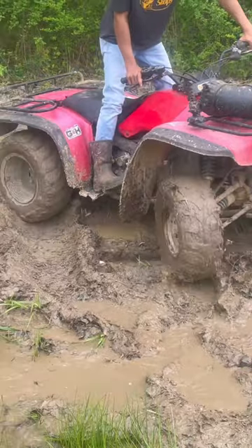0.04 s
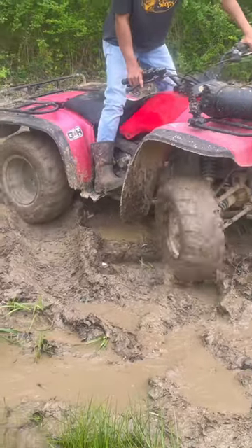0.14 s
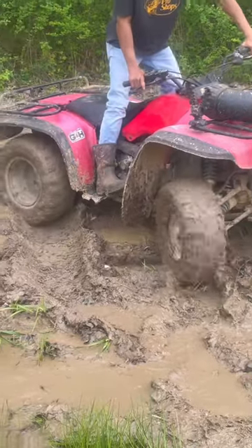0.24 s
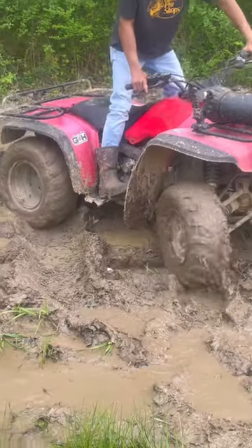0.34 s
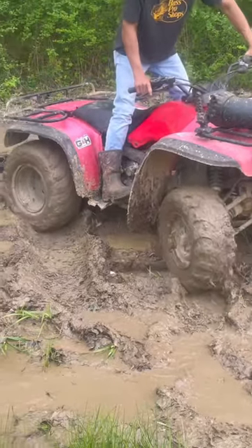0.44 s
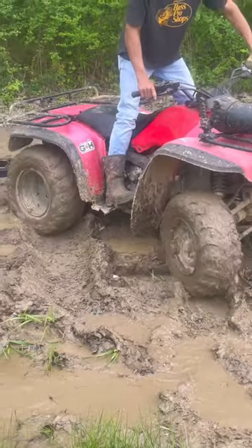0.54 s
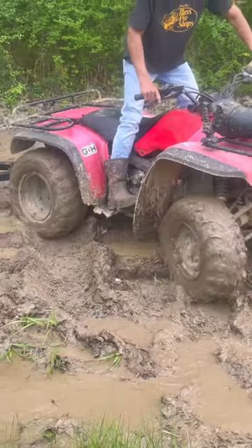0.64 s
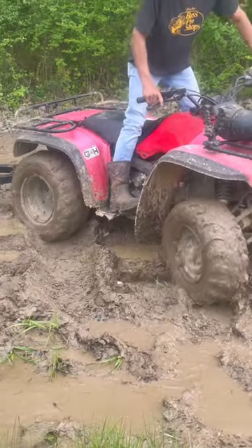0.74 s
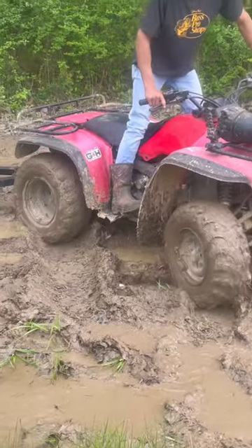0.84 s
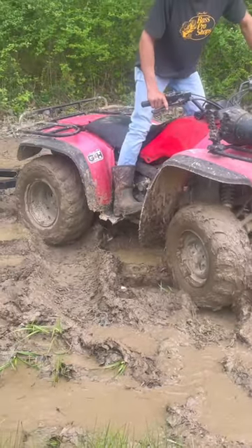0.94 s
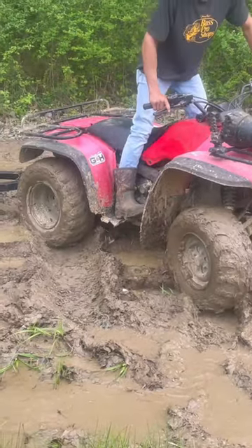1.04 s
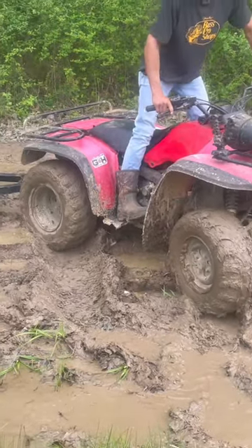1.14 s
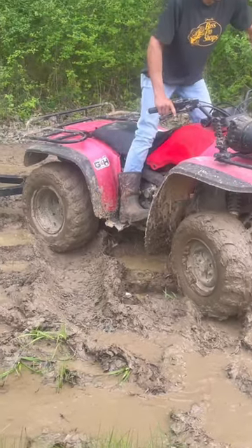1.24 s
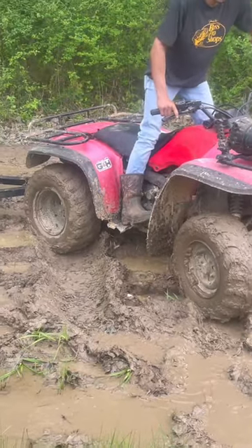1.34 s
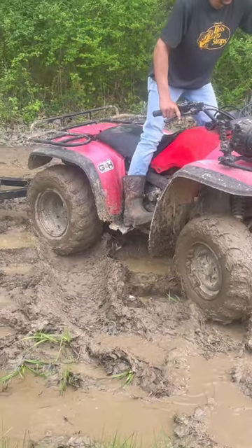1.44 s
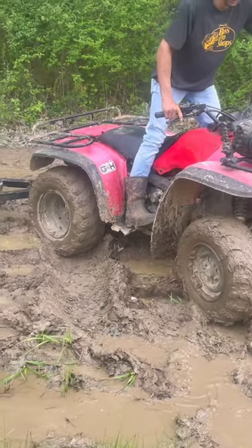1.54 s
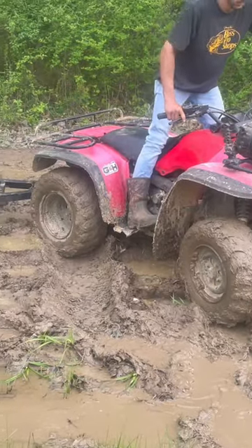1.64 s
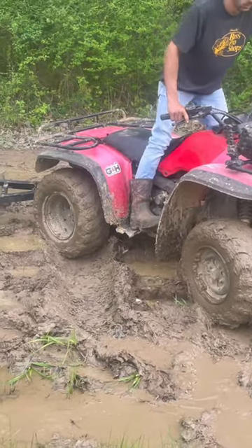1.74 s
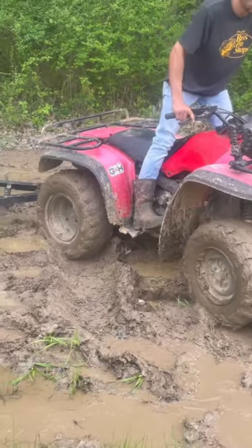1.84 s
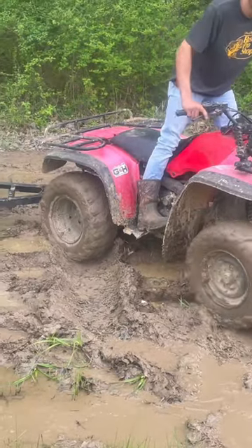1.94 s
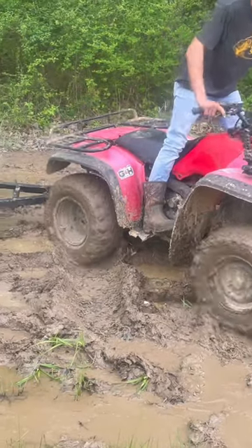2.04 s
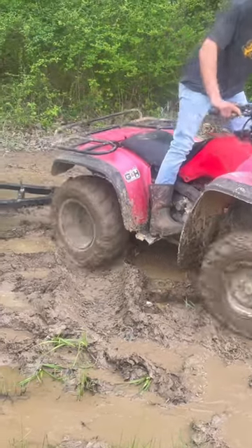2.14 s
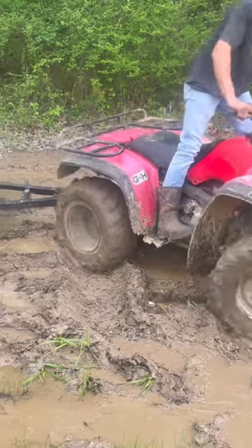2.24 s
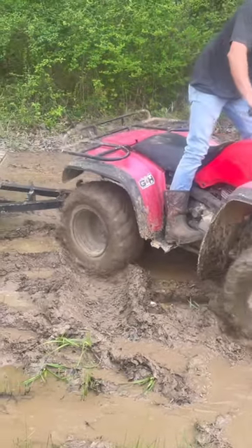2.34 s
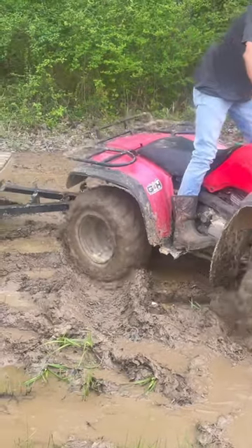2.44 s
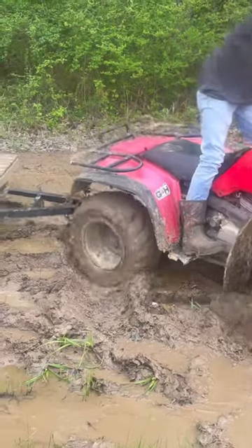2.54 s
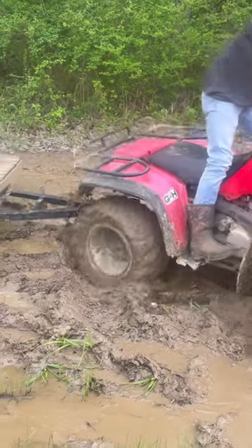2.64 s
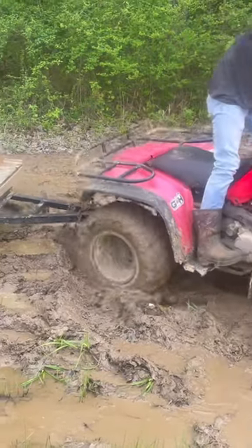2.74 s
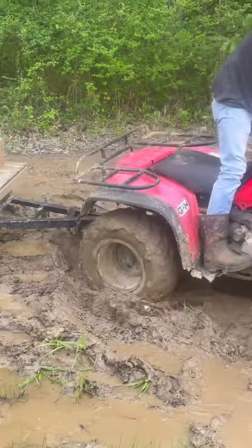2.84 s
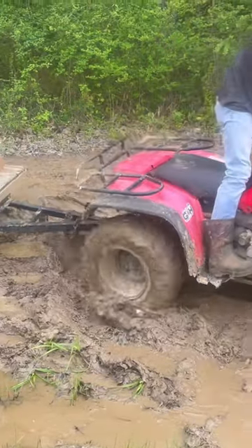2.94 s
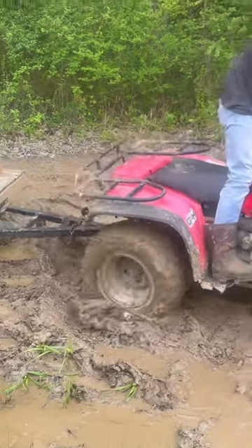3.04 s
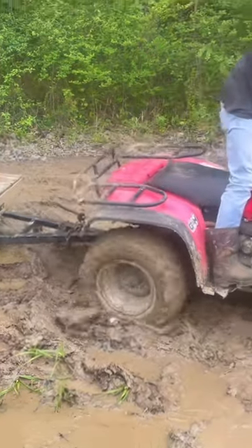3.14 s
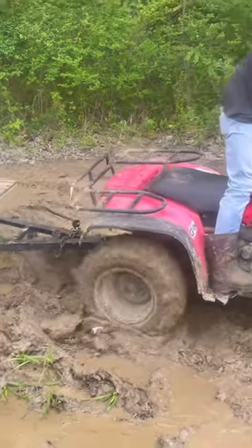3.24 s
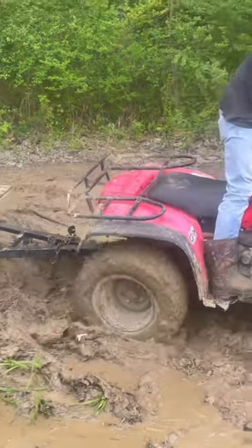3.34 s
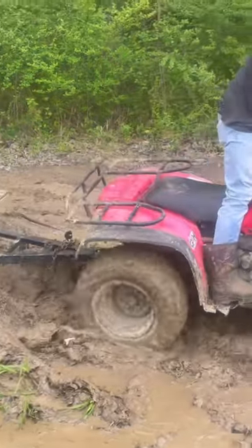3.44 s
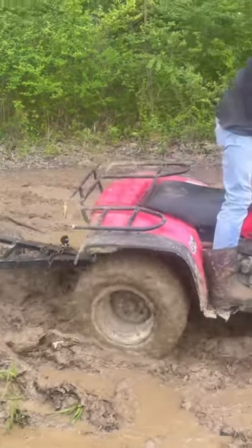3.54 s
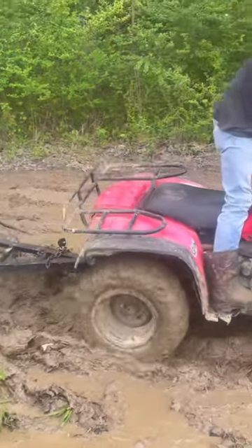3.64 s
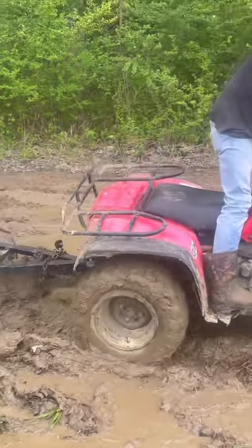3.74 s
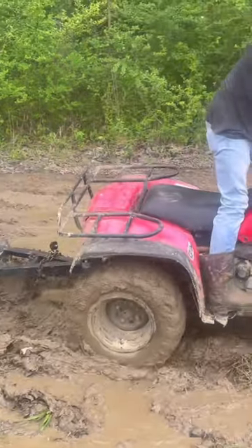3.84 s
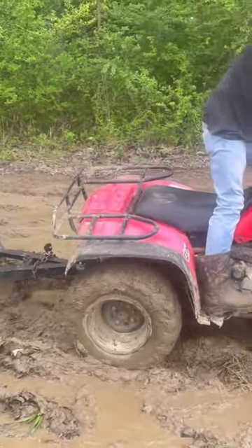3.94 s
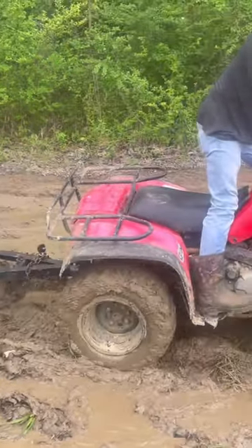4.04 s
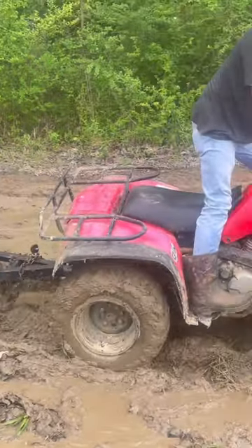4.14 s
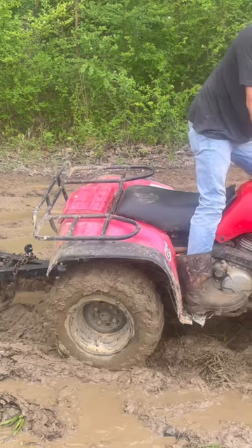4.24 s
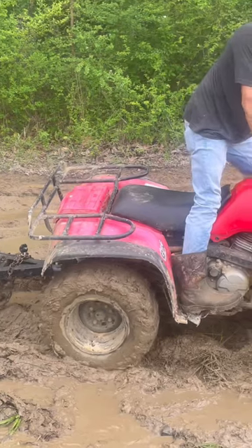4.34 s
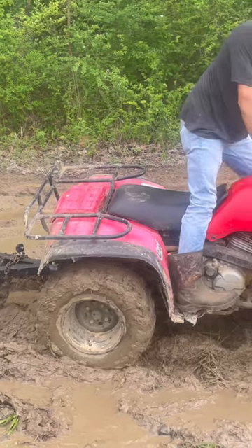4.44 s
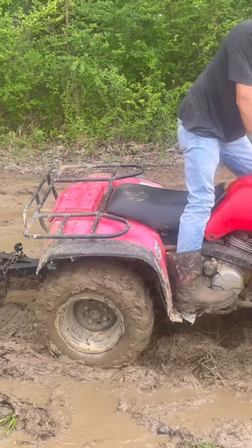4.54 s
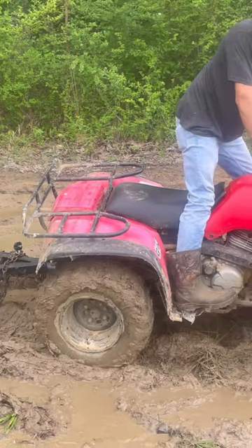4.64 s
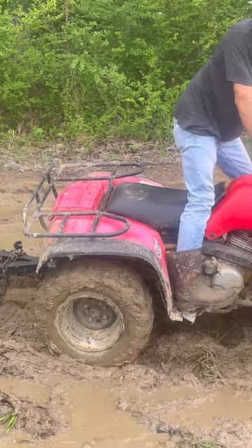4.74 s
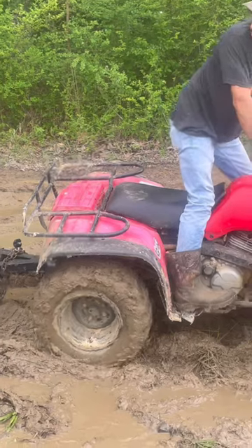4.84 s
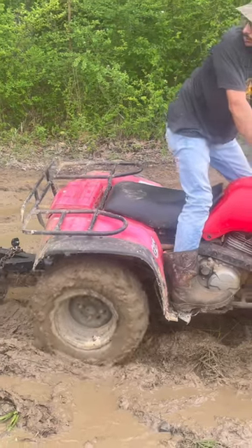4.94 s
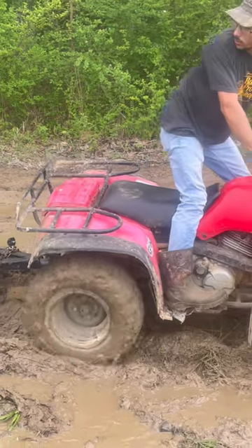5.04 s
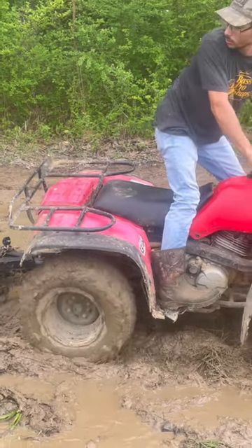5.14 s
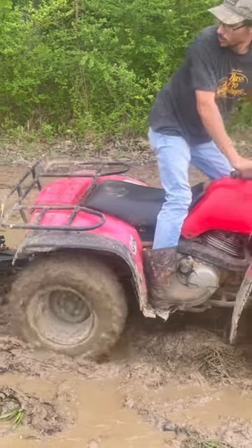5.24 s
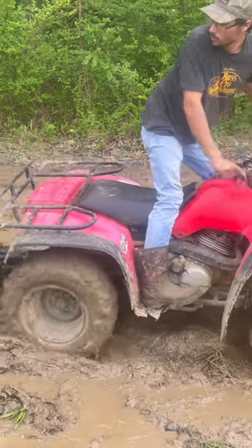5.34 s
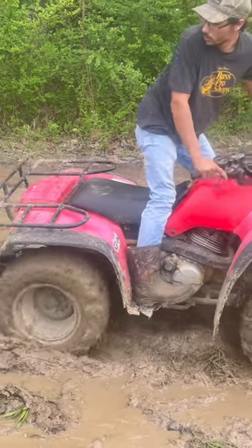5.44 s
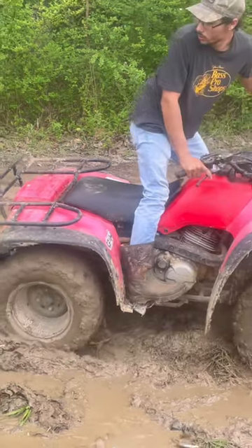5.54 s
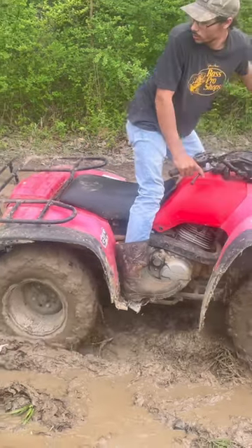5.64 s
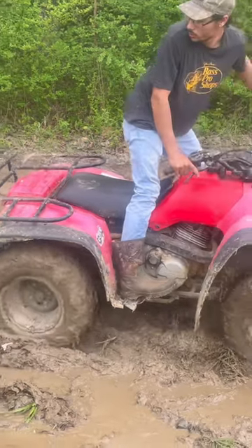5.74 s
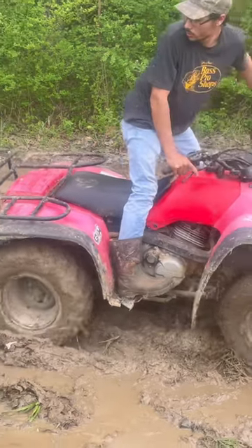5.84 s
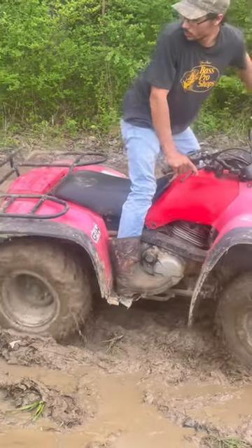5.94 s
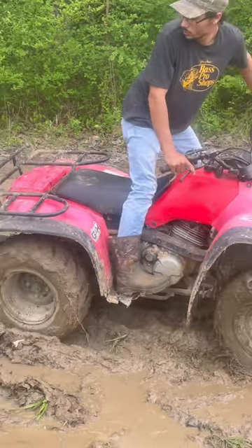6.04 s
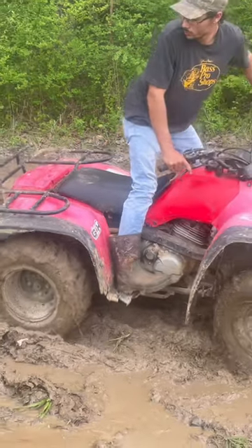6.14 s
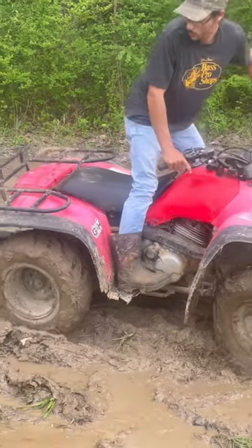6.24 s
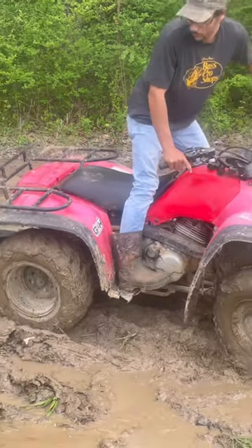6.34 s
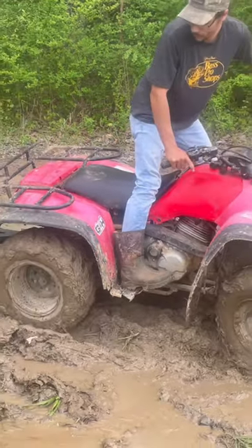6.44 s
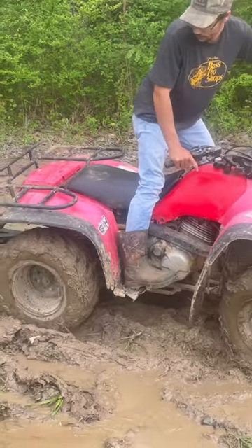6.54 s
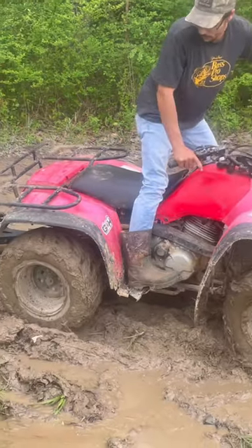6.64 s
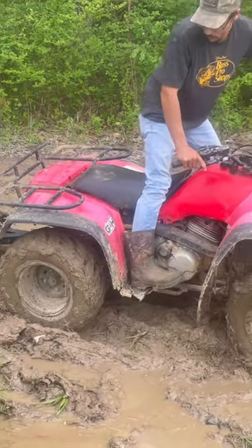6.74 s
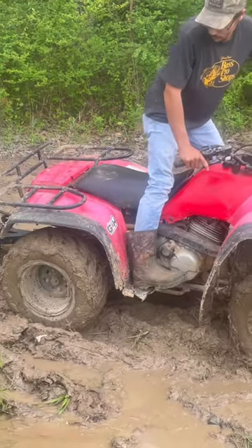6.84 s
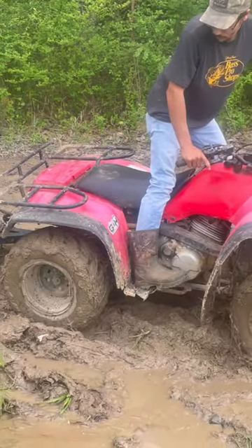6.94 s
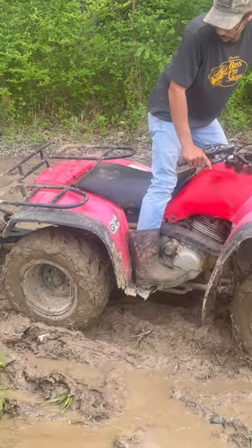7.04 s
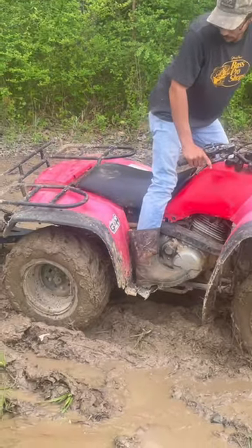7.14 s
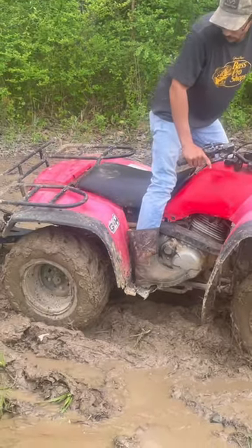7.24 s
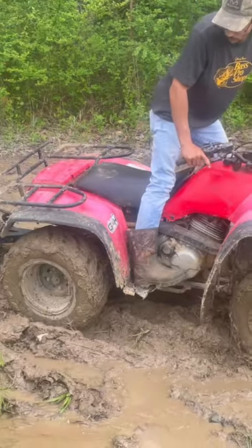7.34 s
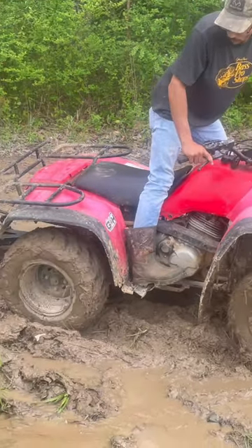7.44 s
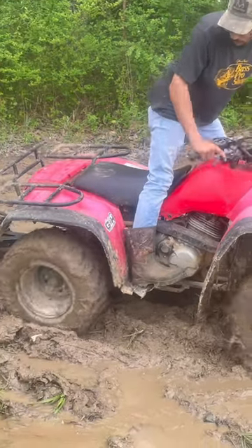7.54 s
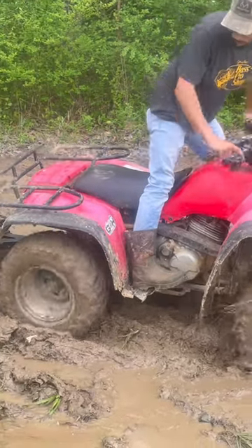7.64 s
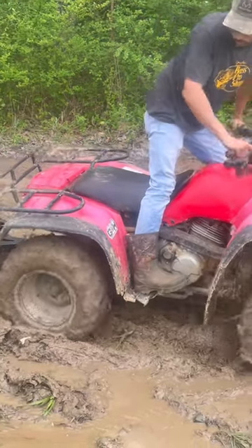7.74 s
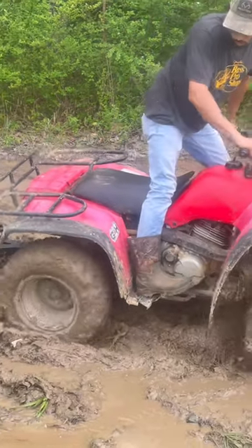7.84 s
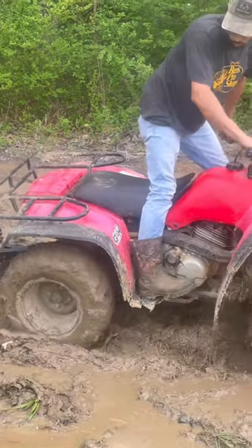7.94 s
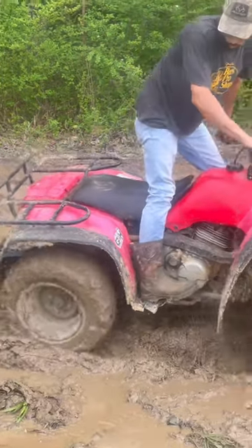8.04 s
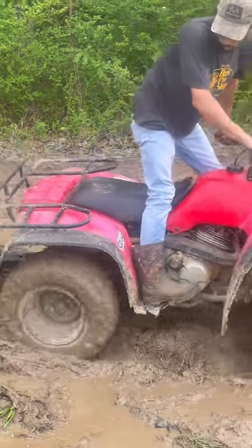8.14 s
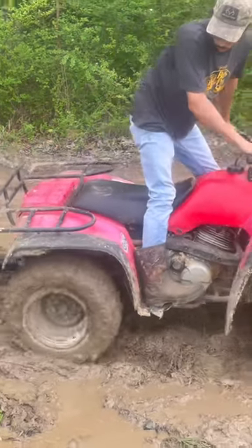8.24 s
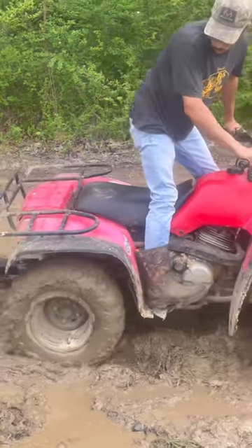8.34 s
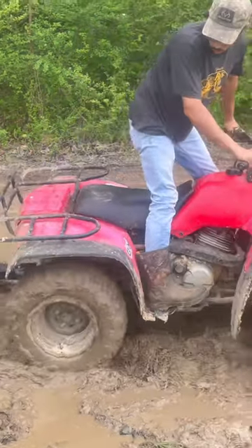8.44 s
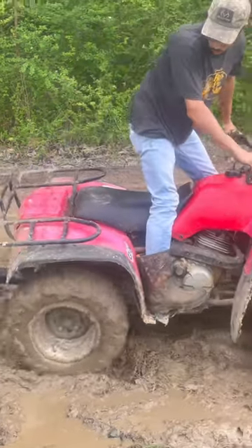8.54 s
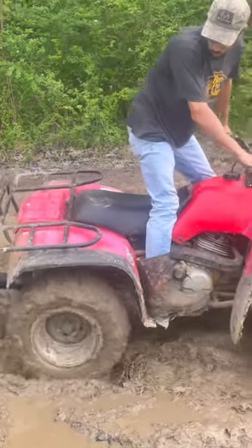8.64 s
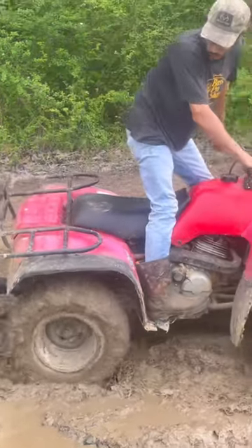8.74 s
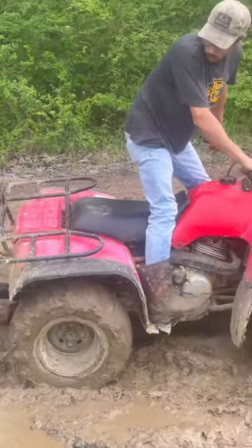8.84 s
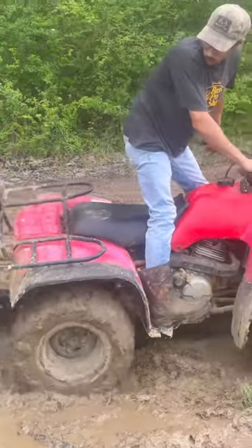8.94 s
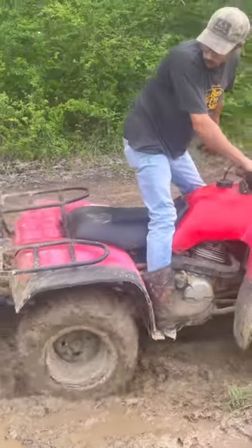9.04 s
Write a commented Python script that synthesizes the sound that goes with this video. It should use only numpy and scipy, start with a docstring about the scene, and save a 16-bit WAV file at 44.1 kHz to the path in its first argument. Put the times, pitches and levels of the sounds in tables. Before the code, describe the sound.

Outdoor close-up of a small four-stroke engine hauling a load: separate deep thumps at idle merge into a rough, rasping growl at each throttle opening. Short coughs mark the pick-ups, a hollow intake honk colours the early pulls, and tyres hiss and squelch through wet mud. Three long surges are split by lumpy, faltering idles, and the last is held to the end. Mechanical clatter sits beneath, with barely any reverberation.

```python
"""Quad bike hauling through mud

A single-cylinder four-stroke quad bike drags a trailer through mud, a few metres away in the open.
The throttle opens in surges between spells of lumpy idle. Each firing booms in the silencer as decaying swings,
barks through ringing pipe and air box, and rasps as puffs of noise at the outlet. Piston and valves tick
at fixed places in the cycle, gears whirr as coloured noise, and the tyres churn wet mud as clustered grains.
"""
import sys
import numpy as np
from scipy import signal
from scipy.fft import rfft, irfft, next_fast_len
from scipy.io import wavfile

SR = 44100
rng = np.random.default_rng(int(sys.argv[2]) if len(sys.argv) > 2 else 0)


def transcribe(signal):
    """Save signal, clipped to [-1, 1], as a 16-bit WAV file at the path in sys.argv[1]."""
    frames = np.atleast_2d(signal).T
    limited = np.clip(frames, -1, 1)
    pcm = np.round(limited * 32767).astype(np.int16)
    wavfile.write(sys.argv[1], SR, pcm)


N = 400869
T = np.arange(N) / SR  # seconds

# Engine speed. Each row: time in seconds, firings a second.
ENGINE_SPEED = [(0.0, 21.97), (0.26, 18.2), (0.32, 14.2), (0.56, 15.26), (0.6, 12.1), (0.77, 19.87),
                (1.11, 11.09), (1.2, 14.94), (1.3, 10.65), (1.64, 11.35), (1.84, 23.09), (2.39, 22.61),
                (2.53, 24.06), (3.0, 25.05), (3.2, 24.48), (3.59, 16.35), (3.68, 11.53), (3.8, 15.67),
                (3.84, 11.96), (4.62, 10.34), (4.68, 15.58), (4.88, 24.64), (5.08, 20.91), (5.57, 17.14),
                (5.7, 20.85), (6.06, 19.13), (6.51, 11.94), (7.17, 11.0), (7.28, 20.48), (7.43, 24.96),
                (7.69, 20.04), (7.96, 22.97), (8.08, 21.61), (8.64, 18.89), (8.84, 20.95), (9.09, 19.65)]
# Throttle surges. Each row: opens in seconds, shuts in seconds, time to open in seconds, time to shut in seconds,
# opening from 0 to 1, extra bark and rasp in dB, extra spray in dB.
THROTTLE_SURGES = [(0, 0.024, 0.023, 0.06, 0.95, 1.5, -7), (0.565, 0.785, 0.066, 0.3, .92, -1.5, -5),
                   (1.562, 3.336, 0.12, 0.18, 0.86, 0, 4.5), (4.56, 6.099, 0.074, 0.16, 0.94, -0.3, 1),
                   (6.24, 6.411, .04, .08, .3, -0.5, 4), (7.108, 9.2, 0.12, .1, 0.95, -0.04, 6)]
# Firing strength before trims, one row each for boom, chamber, bark and rasp. Each row: idle level in dB,
# pulling level in dB, dB per extra firing a second coasting, the same pulling, extra dB in a hard pick-up.
FIRING_LEVELS = [(-22, -12.5, 0.26, 0.16, 2.5), (-29, -22, -0.1, -0.16, -3.5), (-42, -30.5, 0.54, 0.096, 3),
                 (-53.5, -41.5, -0.6, 0.63, 7)]
# Firings that miss or catch with the throttle shut. Each row: time in seconds, level change in dB.
STUMBLES = [(.43, 1.5), (0.499, -2.5), (0.557, -1.5), (1.149, -3), (3.405, -5), (3.456, 5.5), (3.52, -2),
            (3.679, -3.5), (3.929, -6), (6.229, -4.5), (6.518, -5.5), (6.679, -5.5)]
# The bike passes nose first, so silencer and engine come round into the open.
# Each row: time in seconds, boom change in dB, chamber change in dB, clatter change in dB.
PASSING_LEVELS = [(0, -1, -0.5, -1), (.8, -2.5, 3.5, 0.5), (1.35, -3, -0.5, -2), (1.9, -0.2, -1, 0),
                  (2.6, 0.5, -5.5, 1), (4, 0, 1, 1.5), (9.09, 0, 0.5, 2)]
# The air box honks while the front of the bike is near.
# Each row: time in seconds, share of the bark in dB relative to the pipe before trims, tuning as a ratio.
AIR_BOX_HONK = [(0, 3.5, 1.03), (.5, -2.5, 0.97), (.95, 3.5, 1.046), (1.65, 1.5, .92), (1.8, 5, .95),
                (1.95, 9, 1.0), (2.4, 9, 0.98), (2.65, -6, 1.055), (3.1, -6, 1.02), (3.5, -16, 1.02),
                (9.09, -19.5, 1.02)]
# Sound runs faster in hotter gas, so the pipe rises with each push and sags as the engine labours.
# Each row: time in seconds, tuning as a ratio.
PIPE_TUNING = [(0, .96), (2.4, .98), (2.9, 1.01), (3.6, .97), (4.6, .96), (4.88, 1.05), (5.15, .99),
               (5.55, .97), (5.8, 1.01), (6.3, .96), (7.15, .96), (7.4, 1.06), (7.6, .99), (7.9, 1.08),
               (8.15, 1.02), (8.6, .93), (8.8, 1.01), (9.09, .96)]

# Resonances before tuning. Each row, in all seven tables: frequency in Hz, width in Hz, level in dB.
PIPE_MODES = [(392.6, 28, 5), (528.3, 27, 8.5), (639.4, 24, 5.5), (781.5, 38, 7), (852, 20, -0.5),
              (968, 36, 1.5), (1180, 8.3, -6.5), (1297, 17, -7)]  # exhaust pipe
TAIL_PIPE_MODES = [(1250, 78, 6.5), (1380, 13, 2.5), (1719, 140, -3), (1790, 110, 2), (2100, 110, -1.5),
                   (2250, 140, -4), (3070, 130, -11)]  # the cooler end of the pipe
AIR_BOX_MODES = [(323, 20.2, 12.5), (407.4, 11, 6), (556, 26, 3), (853.5, 36, 4.5), (911.4, 29, 5.5)]  # air box
INLET_MODES = [(313, 57, 1), (417, 45, 1), (580, 22, -9.5)]  # inlet tract
CASE_MODES = [(735, 120, -2.5), (952, 50, 3.5), (1236, 70, -1), (1686, 77, 0.5), (1980, 130, -2.5),
              (2184, 36, -7.5), (2410, 19, -7.5), (2853, 73, -13)]  # crankcase and its fins
FIN_MODES = [(3440, 43, -3), (3910, 80, 0.5), (4230, 110, -3.5), (4480, 56, -4.5), (4810, 87, 1.5),
             (5120, 46, -1.5), (5880, 110, -8), (6700, 83, -6)]  # thin ring of the cooling fins
DRIVE_MODES = [(4120, 50, -2), (4520, 65, -1), (4780, 50, -7)]  # drive train; the noise passes these twice

# Spectral shapes, levelled later. Each row, in all eight tables: frequency in Hz, gain in dB.
RASP_COLOUR = [(300, -14), (600, -8), (1000, 3), (1120, -7.5), (1300, 8), (1500, -3), (1730, 4), (2150, -4),
               (2560, -18), (2950, -8), (3700, -26.5), (3900, -14.5), (5050, -28), (5400, -28),
               (5850, -23.5), (6800, -20), (8000, -44)]  # gas at the outlet
CHUFF_COLOUR = [(250, -13), (400, 5), (490, -16.5), (630, 4), (730, -1.5), (900, -0.5), (1100, -3),
                (1500, -27), (3000, -38)]  # a lazy or hurried firing chuffs instead of ringing
WHIRR_COLOUR = [(40, -6.5), (80, -2), (180, 4), (330, 0), (480, -10), (700, -7), (980, 1), (1330, -7.5),
                (1500, -11), (1750, -1), (2150, -5), (2600, -18), (3000, -14), (5000, -24.5), (5500, -30)]  # gears
SPRAY_COLOUR = [(1500, -16), (2800, 5.5), (3600, -18.5), (4700, 5.5), (5400, -26), (6000, 1.5),
                (7000, -15.5), (8200, -42)]  # wet grit
SQUELCH_COLOUR = [(500, 6.0), (1200, 8.0), (2200, 5.5), (4000, -8), (5500, -11.5), (7000, -10.5), (8500, -30.0)]
SPIT_COLOUR = [(400, 5.0), (1000, -2), (1500, -5.5), (1800, 8.0), (2200, 0.5), (2600, -9), (3100, -5.5),
               (4000, -11), (5500, -24.0), (7000, -20.5), (9000, -43)]
BURBLE_COLOUR = [(30, -13.0), (60, -9), (120, -4.0), (180, 5.0), (240, 3.0), (370, 0.0), (480, -16.0), (900, -54.0)]
BUSH_COLOUR = [(120, -6), (500, 1), (1500, 0), (8000, -10)]
# The walls of the pipes and the air box soak up the treble. Each row: frequency in Hz, gain in dB.
WALL_LOSS = [(1000, -4.5), (1400, -7.5), (2500, -15.5), (6000, -32)]

# Combustion knock, exhaust valve, piston slap. Each row: place in the cycle from 0 to 1,
# mean level in dB before scaling, decay in seconds.
TAPS = [(.66, -7.5, 0.027), (.76, -3.5, 0.012), (.28, -5, 0.0013)]
# Short bright coughs, mostly as the throttle opens, one from a stumbling firing as it shuts.
# Each row: start in seconds, level in dB, decay in seconds.
COUGHS = [(0.033, -35, 0.0029), (1.64, -28, 0.023), (1.709, -19, 0.017), (1.872, -21, 0.008),
          (3.447, -22.5, 0.0082), (4.628, -25.5, 0.028), (4.699, -19, 0.017), (4.764, -19, 0.0098),
          (4.814, -17, 0.006), (4.859, -18.5, 0.0073), (4.902, -22, 0.0065), (7.186, -21.5, 0.03),
          (7.265, -22.5, 0.012), (7.311, -19.5, 0.018)]
# Clods of mud slap and squelch. Each row: start in seconds, level in dB before a trim, decay in seconds.
CLODS = [(0.471, -36.5, 0.022), (1.071, -38, 0.029), (1.461, -43.5, 0.076), (1.536, -49, 0.031),
         (3.996, -36, 0.028), (4.159, -64, 0.0033), (6.508, -45.5, 0.054), (6.664, -37, 0.033)]
# Level between the two microphone ports. Each row: frequency in Hz, left minus right in dB.
PORT_DB = [(140, 0), (210, 1), (320, 2), (490, 4), (740, 5.5), (1130, -2), (1710, -1.0), (2600, -1.5)]
# Phase between the two microphone ports. Each row: frequency in Hz, radians by which left leads.
PORT_LEAD = [(40, .15), (125, 0.3), (400, 0.14), (1000, 0.24), (2500, 1), (8000, 1)]

START_TURN = .3  # engine cycles already turned at the start
IDLE_RATE, PULL_RATE = 11, 20  # firings a second
FIRING_S = .05  # span over which the strength of a firing is reckoned as rms
STUMBLE_S = .05  # width of a stumble
HARD_PICKUP, PICKUP_S = 3.1, 0.076  # a hard pick-up gains this many firings a second in this time
SOFT_BOOM_DB, HARD_BOOM_DB = -23, -12.5  # a boom this soft is long and sagging, one this hard is short
CLEAN_IDLE, CLEAN_PULL, CLEAN_LOST = .25, .99, .35  # clean share of the bark; share of it lost in a pick-up
PIPE_LAG_S, PIPE_SWELL_S = 0.00182, .0008  # pipe: delay after the valve opens, build-up
BOX_LAG_S, BOX_SWELL_S = .0005, .0018  # air box: the same
PICKUP_HONK_DB = -5.5  # air box relative to the pipe, added in a hard pick-up, before trims
ROUND_TRIP_S = .0035  # down the header and back
RASP_RISE_S, RASP_DECAY_S = .0025, .012
TAIL_PIPE_DB = -1
TAIL_GLIDE, TAIL_SWELL_S = 0.5, 0.00081  # the cooler tail pipe takes this share of the glide; its build-up
GULP_PLACE, GULP_DB, GULP_OPEN_DB = .67, -50, 8.5  # place in the cycle, level throttle shut, rise fully open
CLATTER_DB, CLATTER_RISE_DB = -45.5, 0.8564  # at idle, and per extra firing a second, before the passing change
SLACK_PLACE, SLACK_DB = 0.76, 2  # the gears run slack at this place in the cycle, and are this much quieter
FIN_DB = -18  # relative to the clatter
WHEEL_LAG_S = 0.35  # the wheels take a while to spin up
SPRAY_DB, SPRAY_RISE_DB = -60, 0.84  # at a steady pull, and per extra firing a second, before the surge's extra
WHINE_DB = -47  # at its height
WHINE_S, WHINE_LENGTH_S = 2.8, 0.42  # the wheels spin fastest here, for about this long either side
LOW_CUT_HZ, TOP_HZ = 46, 7600


def undb(db):
    """Decibels to gain."""
    return 10 ** (np.asarray(db) / 20)


def curves(table, at):
    """Read each value column of a timed table at the given seconds."""
    s, *columns = np.transpose(table)
    return [np.interp(at, s, c) for c in columns]


def over_hz(points, hz):
    """Join a table of frequency and value on a log-frequency axis."""
    f, value = np.transpose(points)
    return np.interp(np.log(np.maximum(hz, 1)), np.log(f), value)


def filtered(x, response):
    """Pass x through a frequency response, given as a function of Hz."""
    size = next_fast_len(N + SR // 4, True)
    spectrum = rfft(x, size) * response(np.fft.rfftfreq(size, 1 / SR))
    return irfft(spectrum, size)[..., :N]


def colour(x, points):
    """Shape x with a spectrum of frequency and dB."""
    return filtered(x, lambda hz: undb(over_hz(points, hz)))


def ring(x, modes):
    """Damped resonances in parallel; neighbours swing in opposite senses."""
    def response(hz):
        total = 0
        for k, (f, width, db) in enumerate(modes):
            damping = 1j * hz * width
            total = total + (-1) ** k * undb(db) * damping / (f * f - hz * hz + damping)
        return total
    return filtered(x, response)


def retuned(x, modes, tuning, swell_s):
    """Resonances that take swell_s to build up, and whose pitches all glide by the ratio tuning."""
    # ring on a warped clock, then unwarp
    clock = np.cumsum(tuning) / SR
    x = np.interp(T, clock, x)
    extra = 1 / (np.pi * swell_s)
    # taking away a faster-dying copy softens the onset
    onset = [(f, w + extra, db + 20 * np.log10(w / (w + extra))) for f, w, db in modes]
    return np.interp(clock, T, ring(x, modes) - ring(x, onset))


def unit(x):
    """Scale to rms 1."""
    return x / np.sqrt(np.mean(x ** 2))


def noise(spread):
    """Stereo noise; spread is side over mid."""
    mid, side = rng.standard_normal((2, N))
    return unit(np.array([mid + spread * side, mid - spread * side]))


def walk(rate):
    """Random drift with a spread near 1, heading for a new value rate times a second."""
    return np.interp(T * rate, np.arange(4096), rng.standard_normal(4096))


def burst(age, rise_s, decay_s):
    """An envelope that swells from age 0 and dies away."""
    age = np.maximum(age, 0)
    return (1 - np.exp(-age / rise_s)) * np.exp(-age / decay_s)


def clicks(times, sizes):
    """Impulses, each shared between two neighbouring samples."""
    whole, part = np.divmod(np.clip(times * SR, 0, N + 1), 1)
    whole = whole.astype(int)
    sizes = sizes * (times >= 0)
    early = np.bincount(whole, sizes * (1 - part), N + 3)
    late = np.bincount(whole + 1, sizes * part, N + 3)
    return (early + late)[:N]


def puffs(times, sizes, rise_s, decay_s):
    """A burst envelope at each of the times."""
    return signal.fftconvolve(clicks(times, sizes), burst(T[:SR // 6], rise_s, decay_s))[:N]


def as_strong(x, sizes):
    """Scale a train of firings so that it holds the energy of their sizes."""
    return x * np.sqrt(np.sum(sizes ** 2) * FIRING_S * SR / np.mean(np.sum(x ** 2, axis=-1)))


def throttle(times):
    """Throttle opening, extra bark dB and extra spray dB: each surge opens, holds and shuts."""
    total = 0
    for opens, shuts, rise_s, fall_s, *amounts in THROTTLE_SURGES:
        opening = np.clip((times - opens) / rise_s, 0, 1)
        closing = np.clip(1 - (times - shuts) / fall_s, 0, 1)
        total = total + np.outer(amounts, opening * closing)
    return total


def pickup(times):
    """How hard the engine is gaining speed, 0-1."""
    rate, = curves(ENGINE_SPEED, times)
    before, = curves(ENGINE_SPEED, times - PICKUP_S)
    return np.tanh(np.maximum(rate - before, 0) / HARD_PICKUP)


def load(times):
    """Boom, chamber, bark and rasp of each firing in dB, set by throttle, speed and pick-up."""
    rate, = curves(ENGINE_SPEED, times)
    gas, extra_db, _ = throttle(times)
    stumble_db = sum(db * np.exp(-((times - s) / STUMBLE_S) ** 2) for s, db in STUMBLES)
    levels = []
    for idle_db, pull_db, coast, pull, pickup_db in FIRING_LEVELS:
        coasting = idle_db + coast * (rate - IDLE_RATE)
        pulling = pull_db + pull * (rate - PULL_RATE) + pickup_db * pickup(times)
        levels.append((1 - gas) * coasting + gas * pulling + stumble_db)
    boom, chamber, bark, rasp = levels
    boom_db, chamber_db, _ = curves(PASSING_LEVELS, times)
    return boom + boom_db, chamber + chamber_db, bark + extra_db, rasp + extra_db


def wheel_spin():
    """The wheels follow the engine with a lag; in firings a second above a steady pull."""
    rate, = curves(ENGINE_SPEED, T)
    keep = np.exp(-1 / (WHEEL_LAG_S * SR))
    return signal.lfilter([1 - keep], [1, -keep], rate - PULL_RATE)


def thicket(x, decay_s, wet_db):
    """Faint scattered echoes from the wall of bushes behind the track: a late, decaying noise tail."""
    echo = rng.standard_normal((2, SR // 2)) * burst(T[:SR // 2] - .02, 0.038, decay_s)
    echo /= np.sqrt(np.sum(echo ** 2, axis=1, keepdims=True))
    scattered = signal.fftconvolve(x, echo, axes=1)[:, :N]
    return undb(wet_db) * colour(scattered, BUSH_COLOUR)


def mud():
    """Wet grit thrown in clusters by the tyres, and single clods that squelch: noise under two envelopes."""
    _, _, thrown_db = throttle(T)
    spray_db = SPRAY_DB + SPRAY_RISE_DB * wheel_spin() + thrown_db
    grains = noise(.9) * undb(2.2 * walk(430) + 1.6 * walk(60))
    spray = unit(colour(grains, SPRAY_COLOUR))
    squelch = unit(colour(grains, SQUELCH_COLOUR))
    clods = sum(undb(db) * burst(T - s, 0.0056, decay) for s, db, decay in CLODS)
    return spray * undb(spray_db) + squelch * undb(6.5) * clods


def whine():
    """The drive train sings while the wheels spin fastest: noise through sharp resonances."""
    swell = np.exp(-((T - WHINE_S) / WHINE_LENGTH_S) ** 2)
    song = unit(ring(ring(noise(0.73), DRIVE_MODES), DRIVE_MODES))
    return undb(WHINE_DB) * swell * song


def machinery(turns):
    """Piston knock and valve ticks ring the case, over gears that whirr as their load comes and goes."""
    rate, = curves(ENGINE_SPEED, T)
    _, _, side_db = curves(PASSING_LEVELS, T)
    clatter_db = CLATTER_DB + CLATTER_RISE_DB * (rate - IDLE_RATE) + side_db
    cycles = np.arange(int(turns[-1]) + 1)
    taps = knocks = 0
    for place, db, decay_s in TAPS:
        chance = rng.standard_normal((len(cycles), 2)).T
        times = np.interp(cycles + place + 0.002 * chance[0], turns, T, left=-1, right=2 * T[-1])
        # where the noisy tap is loud, the bare knock is soft
        knocks = knocks + clicks(times, undb(db - 3 * chance[1]))
        taps = taps + puffs(times, undb(db + 2.5 * chance[1]), rise_s=0.0004, decay_s=decay_s)
    strain = undb(-SLACK_DB * np.cos(2 * np.pi * (turns - SLACK_PLACE)))
    clatter = unit(ring(noise(0.3) * taps + 13 * knocks, CASE_MODES))
    whirr = unit(colour(noise(0.26), WHIRR_COLOUR) * strain * undb(1.8 * walk(40)))
    fins = unit(ring(noise(1.0) * (taps + 0.21 * strain), FIN_MODES))
    return undb(clatter_db) * (clatter + whirr + undb(FIN_DB) * fins)


def coughs():
    """Short bright coughs, mostly as the throttle opens, one from a stumbling firing as it shuts: noise bursts."""
    strength = sum(undb(db) * burst(T - s, 0.0018, decay) for s, db, decay in COUGHS)
    return strength * unit(colour(noise(0.21), SPIT_COLOUR))


def intake(turns):
    """The cylinder gulps air once a cycle, and each gulp rings the inlet tract."""
    times = np.interp(np.arange(int(turns[-1])) + GULP_PLACE, turns, T)
    gas, _, _ = throttle(times)
    sizes = undb(GULP_DB + GULP_OPEN_DB * gas)
    return as_strong(ring(colour(clicks(times, sizes), WALL_LOSS), INLET_MODES), sizes)


def burble(times):
    """Gas tumbling in the silencer around each firing: soft low noise that weighs most at idle."""
    boom_db, _, _, _ = load(times)
    sizes = undb(np.interp(boom_db, [-24, -16], [-7, -22]) + boom_db)
    gas = noise(.08) * puffs(times - .005, sizes, rise_s=.02, decay_s=.016)
    return as_strong(colour(gas, BURBLE_COLOUR), sizes)


def outlet(times, sizes, effort):
    """Each blow runs to and fro in the header: every return puffs gas, and under load rings the tail pipe."""
    ages = ROUND_TRIP_S * np.arange(10)
    returns = (times[:, None] + ages).ravel()
    strength = np.outer(sizes, burst(ages + ROUND_TRIP_S, RASP_RISE_S, RASP_DECAY_S))
    flutter = undb(1.5 * walk(400))
    gas = noise(0.58) * flutter * puffs(returns, strength.ravel(), rise_s=.0004, decay_s=.003)
    blows = clicks(returns, (strength * effort[:, None]).ravel())
    tuning = curves(PIPE_TUNING, T)[0] ** TAIL_GLIDE
    tail_pipe = retuned(blows, TAIL_PIPE_MODES, tuning, TAIL_SWELL_S)
    rasp = undb(1.4) * as_strong(colour(gas, RASP_COLOUR), sizes)
    return rasp + undb(TAIL_PIPE_DB) * as_strong(tail_pipe, sizes * effort)


def exhaust(times):
    """The opening valve rings pipe and air box, most cleanly in a steady pull; gas chuffs and rasps behind."""
    boom_db, _, bark_db, rasp_db = load(times)
    honk_db, _ = curves(AIR_BOX_HONK, times)
    effort = np.interp(boom_db, [-23, -16], [0, 1])
    # the share of the bark that rings cleanly: small at idle and while the engine picks up
    clean = CLEAN_IDLE + (CLEAN_PULL - CLEAN_IDLE) * effort * (1 - CLEAN_LOST * pickup(times) ** 2)
    # air box and pipe share the energy of the bark; the air box also honks as the engine picks up
    share = undb(honk_db) + undb(PICKUP_HONK_DB) * pickup(times) ** 2
    chance = rng.standard_normal((len(times), 2)).T
    bark = undb(bark_db + .6 * chance[0]) / np.hypot(1, share)
    rasp = undb(rasp_db + 1.3 * chance[1])
    honk = bark * share
    # the bark outruns the boom, most of all at idle
    times = times - .006 * (1 - effort)
    ringing, loose = np.sqrt(clean), np.sqrt(1 - clean)

    pipe_blows = colour(clicks(times + PIPE_LAG_S, bark * ringing), WALL_LOSS)
    pipe = retuned(pipe_blows, PIPE_MODES, *curves(PIPE_TUNING, T), PIPE_SWELL_S)
    chuff_gas = noise(0.082) * puffs(times, bark * loose, rise_s=0.0018, decay_s=0.023)
    chuff = colour(chuff_gas, CHUFF_COLOUR)
    swirl = .05 * rng.standard_normal(N) * puffs(times, honk * loose, .002, .012)
    box_blows = colour(clicks(times + BOX_LAG_S, honk * ringing) + swirl, WALL_LOSS)
    air_box = retuned(box_blows, AIR_BOX_MODES, curves(AIR_BOX_HONK, T)[1], BOX_SWELL_S)

    barking = undb(-0.5) * as_strong(pipe, bark * ringing)
    chuffing = undb(4.5) * as_strong(chuff, bark * loose)
    honking = undb(7.0) * as_strong(air_box, honk)
    return barking + chuffing + honking + outlet(times, rasp, effort)


def swing(age, hz, swell_s, sharp, crest_s, sag=0):
    """Chambers in series: an oscillation that builds up to its top at age 0, then dies as its pitch sags."""
    u = np.maximum(1 + age / swell_s, 0)
    cycles = hz * (age + crest_s) * (1 - sag * np.tanh(age / swell_s))
    wave = (u * np.exp(1 - u)) ** sharp * np.cos(2 * np.pi * cycles)
    return wave / np.sqrt(np.sum(wave ** 2) / (FIRING_S * SR))


def silencer(times):
    """The boom of each firing: short and high when the gas is hot and fast, long and sagging at idle."""
    out = np.zeros(N)
    boom_db, chamber_db, _, _ = load(times)
    rates, = curves(ENGINE_SPEED, times)
    idles = np.clip((HARD_BOOM_DB - boom_db) / (HARD_BOOM_DB - SOFT_BOOM_DB), 0, 1)
    chance = rng.standard_normal((len(times), 5))
    for t, boom, chamber, rate, idle, luck in zip(times, boom_db, chamber_db, rates, idles, chance):
        span = slice(max(int((t - FIRING_S / 2) * SR), 0), int((t + 2 * FIRING_S) * SR))
        age = T[span] - t - .013 - .0065 * idle
        swell_s = .026 + .024 * idle
        uneven = .007 + .05 * idle
        boom_hz = 123 * (rate / 20) ** 0.33 * (1 + uneven * luck[0])
        chamber_hz = 303 * (rate / 20) ** 0.12 * (1 + uneven * luck[1])
        body = swing(age, boom_hz, swell_s, sharp=12, crest_s=.0018, sag=.04 + .2 * idle)
        # the bare push of gas under the ring, uneven when the throttle is shut
        push_hz = .68 * boom_hz * (1 + 3 * uneven * luck[2])
        push = swing(age, push_hz, swell_s, sharp=17, crest_s=.0012)
        push_db = -14.5 + 11.7 * idle + 3.2 * luck[3]
        chamber_sag = idle * (.05 + .04 * luck[2])
        tone = swing(age + .008 * idle, chamber_hz, swell_s, sharp=12, crest_s=.0021, sag=chamber_sag)
        # at top speed a second, later swing lengthens the boom of each firing
        later_gain = np.interp(rate, [21, 25], [0, .3])
        later = later_gain * swing(age - .0155, boom_hz, swell_s, sharp=12, crest_s=.0018)
        # a short overtone between the two chambers thickens the front of the boom
        front = swing(age + .004 + .007 * idle, 1.62 * boom_hz, swell_s, sharp=26, crest_s=.0016)
        front_db = -21 + 15.5 * idle
        out[span] += undb(boom - 2.5) * (body + later + undb(push_db) * push + undb(front_db) * front)
        out[span] += undb(chamber - 3.5 + 0.091 * luck[4]) * tone
    return out


def scene():
    """Firings, ticks and gulps follow the engine cycle; coughs, clods and whine come at their own set times."""
    rate, = curves(ENGINE_SPEED, T)
    turns = START_TURN + np.cumsum(rate) / SR
    # one firing each time the engine completes a cycle
    times = np.interp(np.arange(int(turns[-1]) + 1), turns, T, left=-START_TURN / rate[0])
    running_gear = mud() + whine() + machinery(turns)
    breathing = coughs() + intake(turns)
    firing = burble(times) + exhaust(times) + silencer(times)
    bike = running_gear + breathing + firing
    return bike + thicket(bike, decay_s=.06, wet_db=-18)


def record(dry):
    """Two ports differ in level and phase; deep bass is cut, the tallest peaks rounded and the top cut."""
    sides = np.array([[.5], [-.5]])

    def port_response(hz):
        gain = undb(sides * over_hz(PORT_DB, hz))
        return gain * np.exp(1j * sides * over_hz(PORT_LEAD, hz))

    ports = filtered(dry, port_response)
    ports = filtered(ports, lambda hz: hz ** 3 / np.sqrt(hz ** 6 + LOW_CUT_HZ ** 6))
    rounded = ports / (1 + (ports / .94) ** 6) ** (1 / 6)
    return signal.sosfilt(signal.ellip(8, .2, 70, TOP_HZ, fs=SR, output="sos"), rounded)


dry = scene()
out = record(dry)
transcribe(out)
```